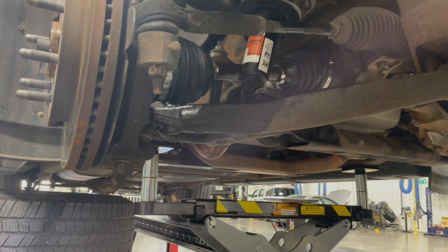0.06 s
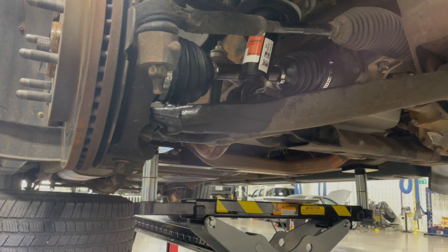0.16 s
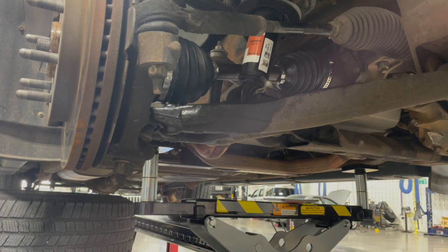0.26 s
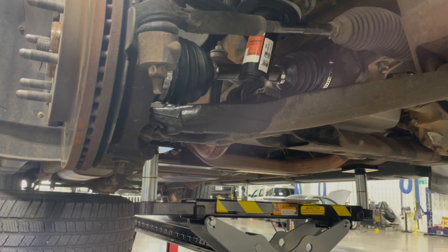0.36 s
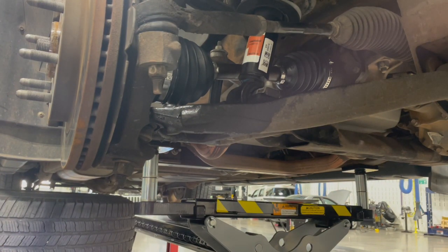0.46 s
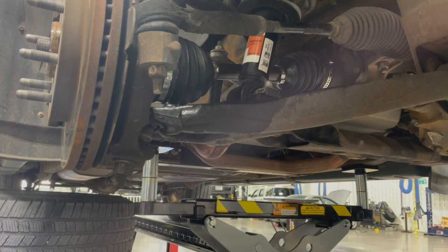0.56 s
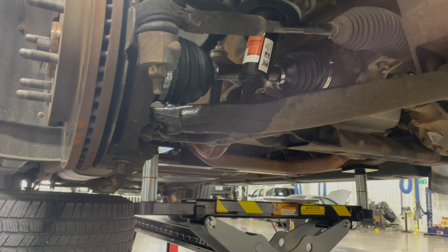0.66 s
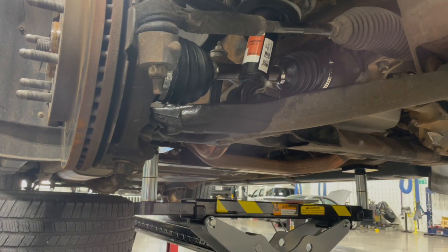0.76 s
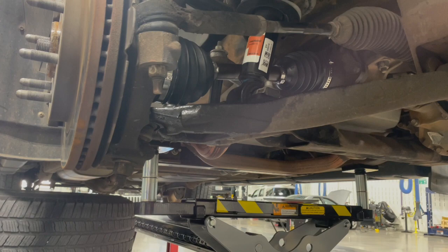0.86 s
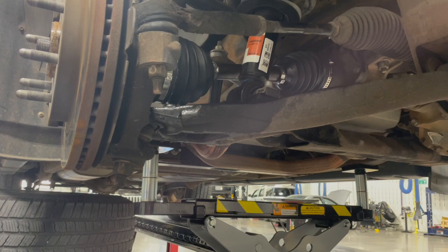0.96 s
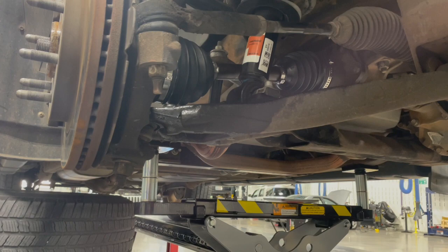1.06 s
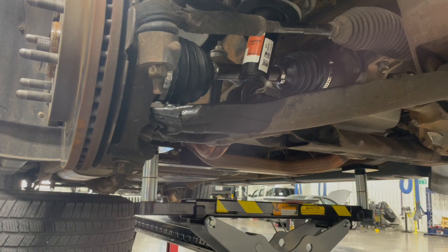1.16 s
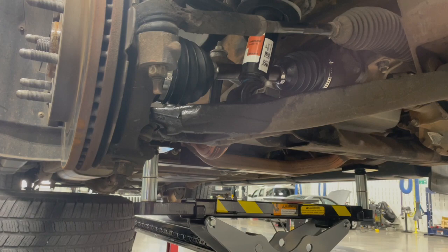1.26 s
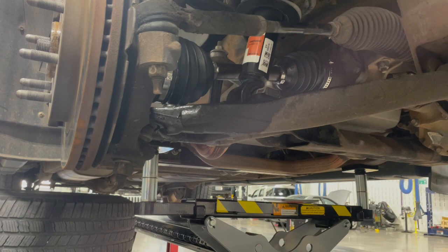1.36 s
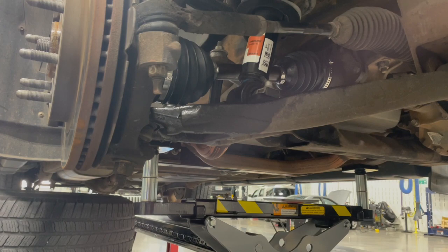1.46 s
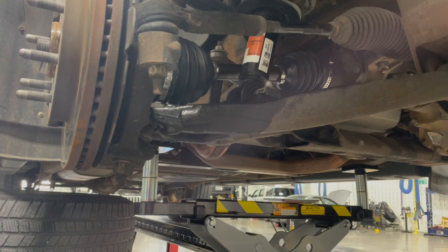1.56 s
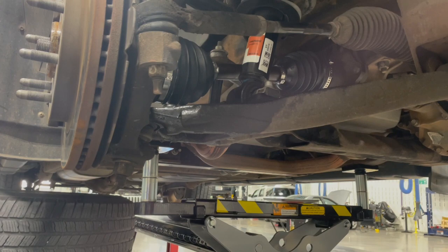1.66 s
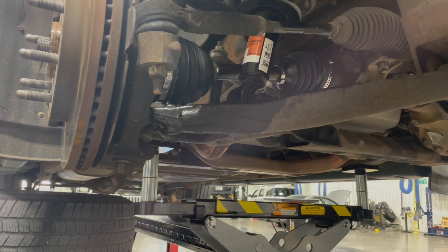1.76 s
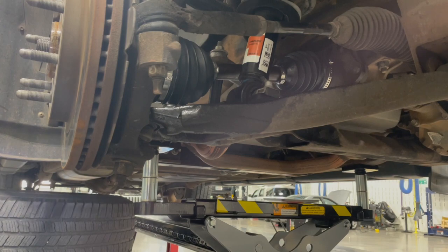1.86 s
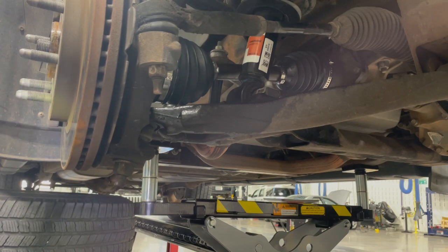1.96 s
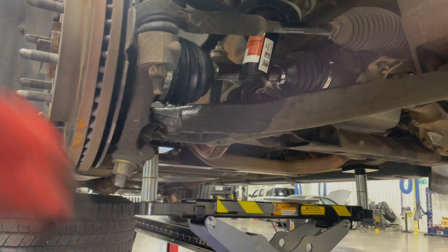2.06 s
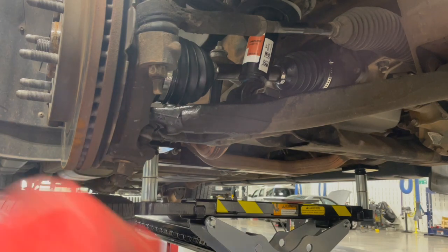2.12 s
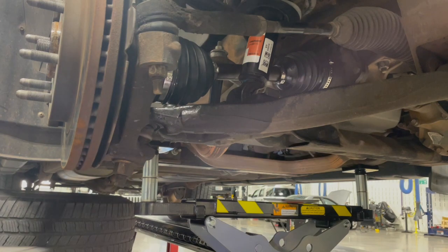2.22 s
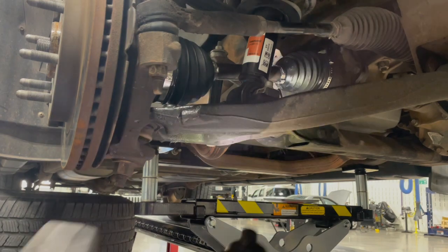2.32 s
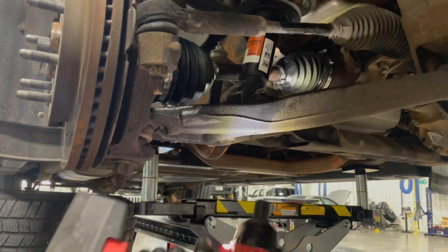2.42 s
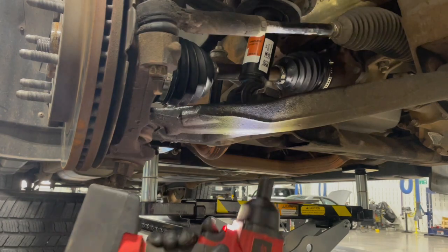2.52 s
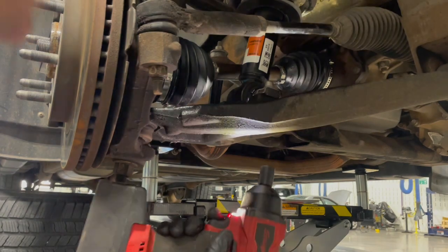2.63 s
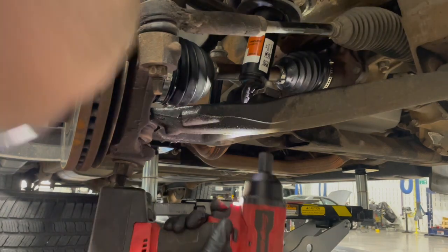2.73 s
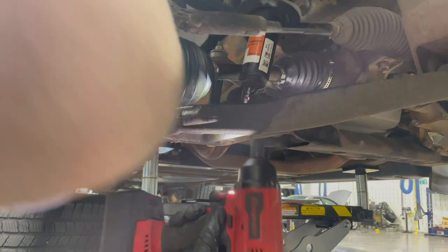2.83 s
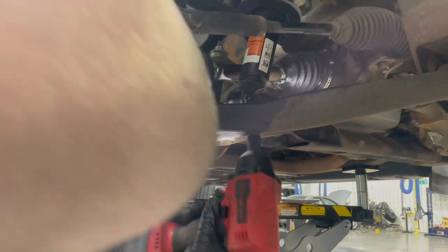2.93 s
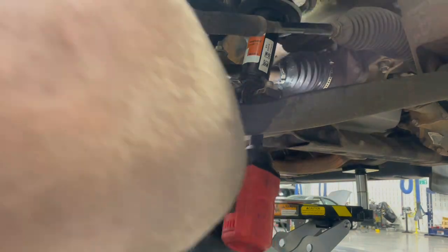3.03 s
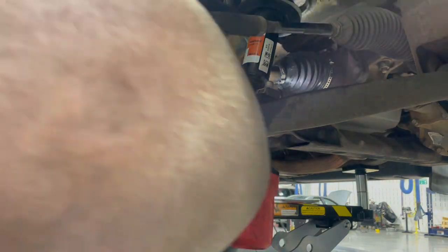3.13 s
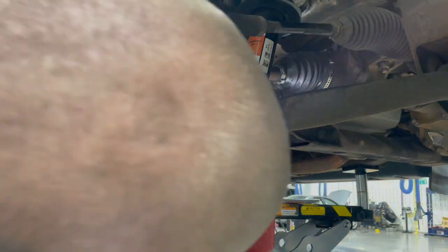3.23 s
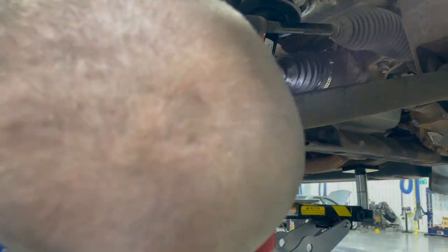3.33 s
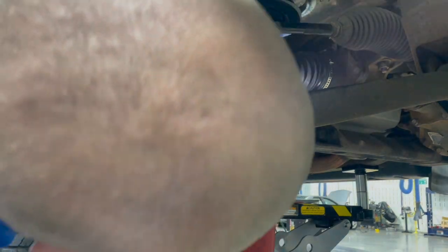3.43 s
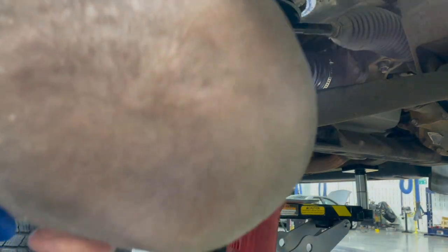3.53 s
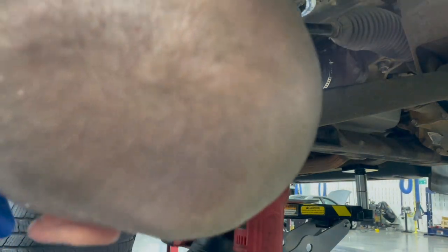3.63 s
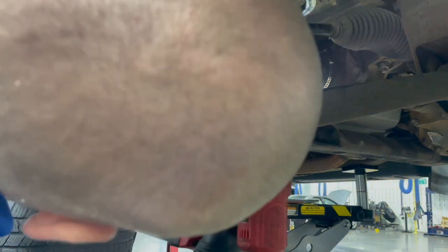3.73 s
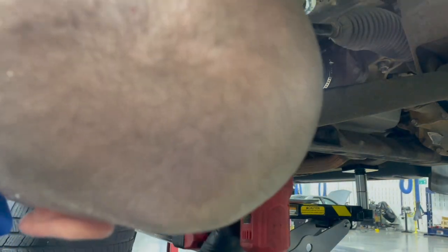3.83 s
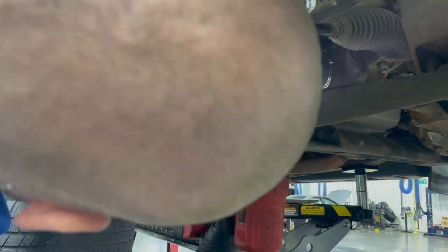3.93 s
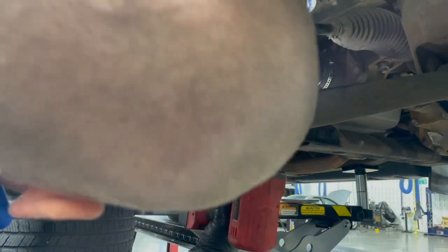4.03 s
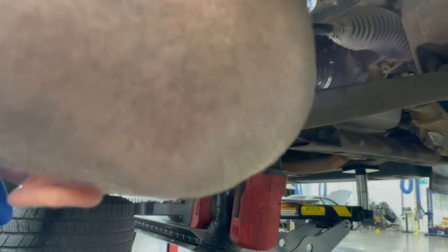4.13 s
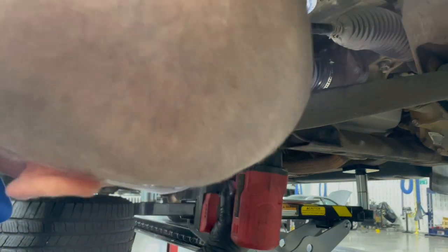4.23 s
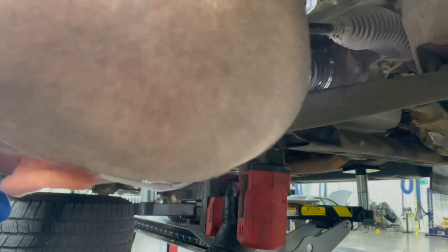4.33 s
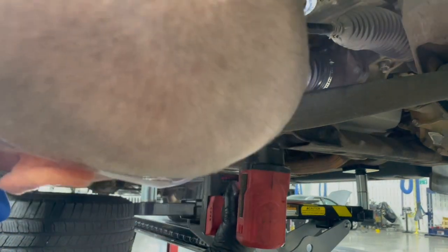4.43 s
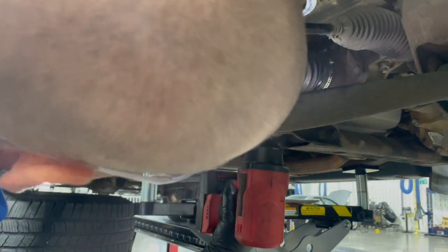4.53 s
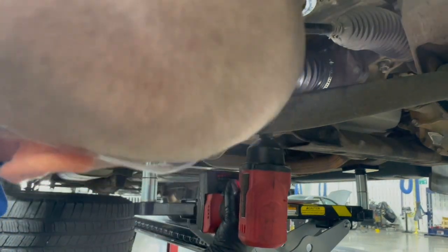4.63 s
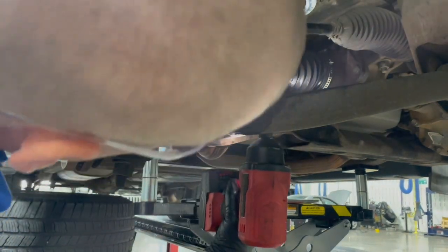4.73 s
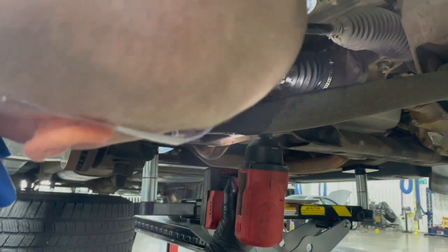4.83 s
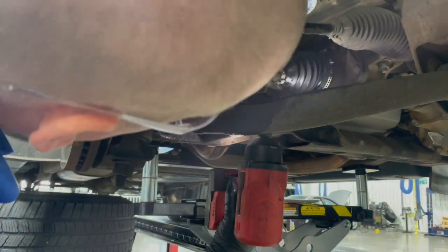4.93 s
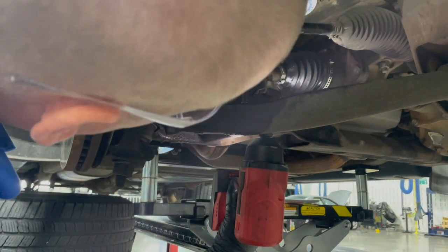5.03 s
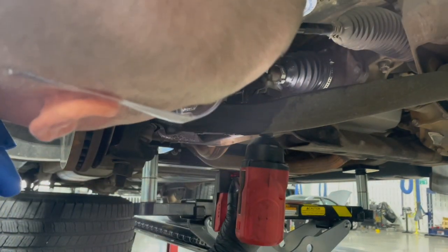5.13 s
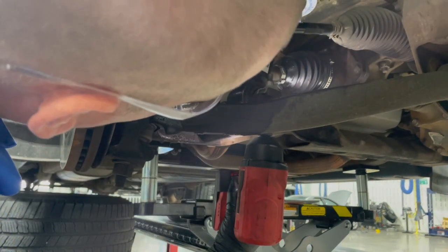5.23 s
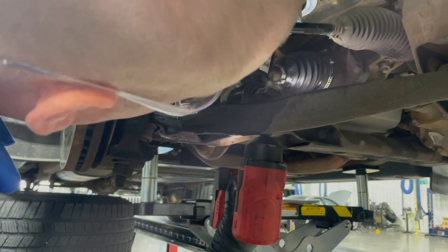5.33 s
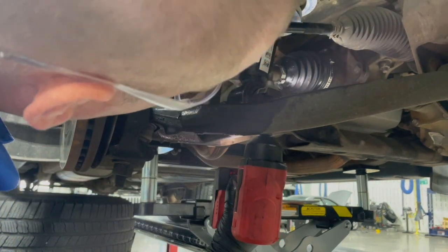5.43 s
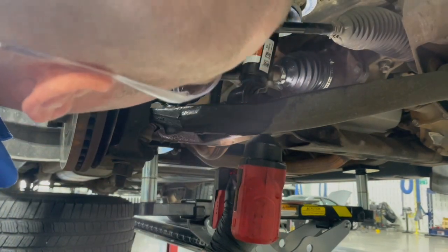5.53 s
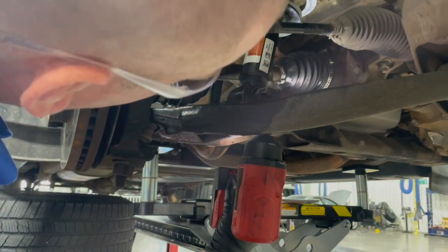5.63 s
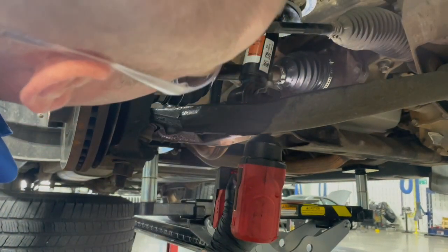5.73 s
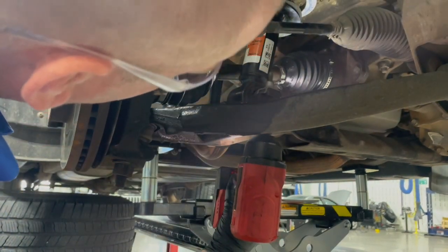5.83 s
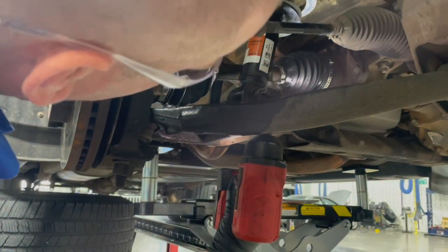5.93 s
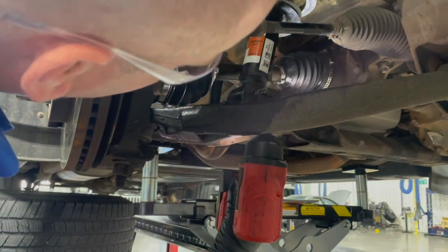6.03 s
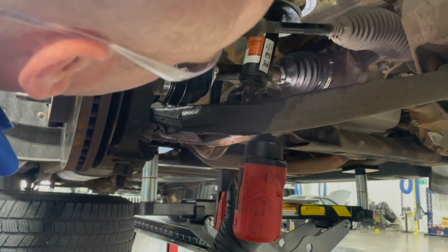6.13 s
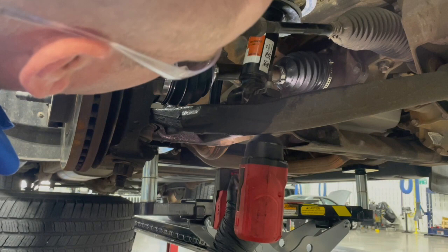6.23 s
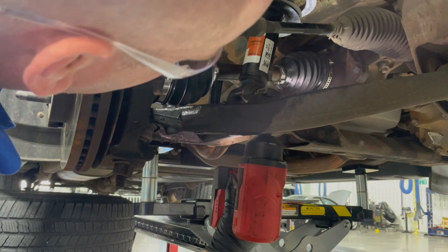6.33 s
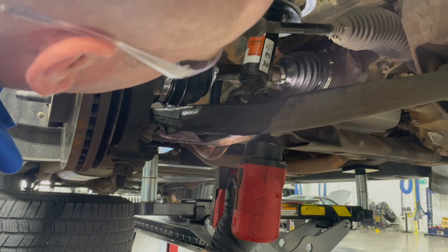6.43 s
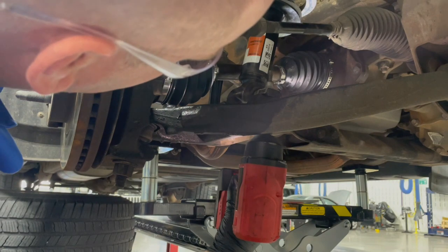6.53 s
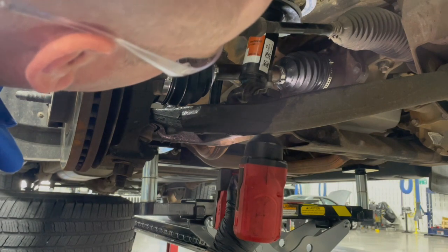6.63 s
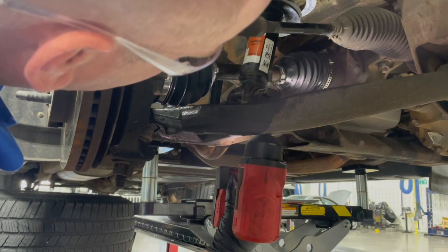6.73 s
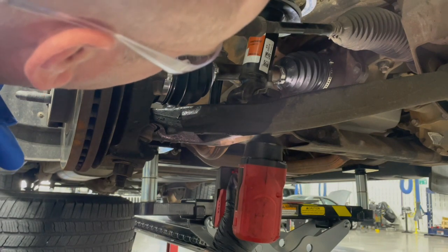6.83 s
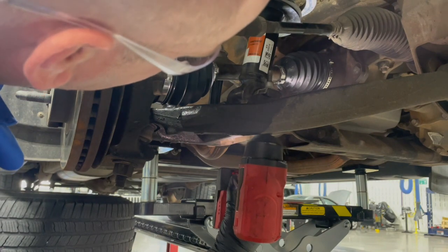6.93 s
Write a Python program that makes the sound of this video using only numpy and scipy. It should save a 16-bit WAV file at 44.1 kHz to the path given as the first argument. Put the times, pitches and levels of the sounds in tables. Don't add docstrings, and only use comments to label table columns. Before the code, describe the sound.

A quiet garage hum, heard close under a car in stereo. At 0.2-0.5 s small metal ticks lead into a gritty sole scuff; a shorter scuff comes near 1.7 s. Soft cloth rustles and faint ticks continue, with a sleeve pull stopping abruptly near 2.8 s. At 3.2 s the socket touches metal with a click and low clink; more knocks at 3.6 and 3.75 s seat it. From 3.93 s the wrench motor whines rapidly upward, and at about 4.15 s the hammer catches: very loud, dense steel blows, about fifty a second, uneven in strength and ring, over gear whirr and suspension ringing. Fan and drone sag as the bolt resists; blows weaken overall around 5.7-6.6 s, with light floor thumps at 5.55 and 6.1 s. At 6.7 s the bolt gives with a thump; hammering becomes faster and stronger, a brief airy gust passes at 6.8 s, and a hard jolt lands at 6.96 s.

```python
import sys
import numpy as np
from scipy import signal
from scipy.fft import rfft, irfft, next_fast_len
from scipy.io import wavfile

SR = 44100
rng = np.random.default_rng(int(sys.argv[2]) if len(sys.argv) > 2 else 0)


def invert_db(x):
    u = np.asarray(x, float) / 20
    return 10 ** u


def materialize(psi):
    bounded = np.clip(np.atleast_2d(psi).T, -1, 1)
    quanta = np.round(bounded * 32767).astype(np.int16)
    wavfile.write(sys.argv[1], SR, quanta)


N = 307377


def unit(x):
    return x / np.sqrt(np.mean(x ** 2) + 1e-20)


def along(points, hz):
    f, v = np.transpose(points)
    return np.interp(np.log(hz + 1), np.log(f + 1), v)


def curves(rows):
    s, *cols = np.transpose(rows)
    return [np.interp(np.arange(N) / SR, s, c) for c in cols]


def wobble(rate, size=N):
    knots = rng.standard_normal(int(size * rate / SR) + 2)
    return np.interp(np.arange(size) * rate / SR, np.arange(len(knots)), knots)


def filtered(x, response):
    m = next_fast_len(N + SR // 2)
    return irfft(rfft(x, m) * response(np.fft.rfftfreq(m, 1 / SR)), m)[..., :N]


def noise(spectrum, channels=2):
    white = rng.standard_normal((channels, N))
    return unit(filtered(white, lambda hz: invert_db(along(spectrum, hz))))


def add(track, s, sound):
    part = track[..., round(s * SR):][..., :sound.shape[-1]]
    part += sound[..., :part.shape[-1]]


def ring(hz, t60, attack=0.0015, size=8192):
    t = np.arange(size) / SR
    return np.sin(2 * np.pi * hz * t) * invert_db(-60 * t / t60) * (1 - np.exp(-t / attack))


def fuzzy(hz, rate, size=N, firm=0):
    turn = 2 * np.pi * np.cumsum(hz + np.zeros(size)) / SR
    return unit((firm + wobble(rate, size)) * np.sin(turn) + wobble(rate, size) * np.cos(turn))


# frequency in Hz, level in dB per Hz.
AIR_SPECTRUM = [(20, -36), (119, -10), (225, -11), (363, -12.5), (420, -20), (820, -21), (1050, -29),
                (3800, -29), (14000, -59)]
AIR_DB = -63
DUCK_S, DUCK_DB = 4.15, -3.5


def still_air():
    air = noise(AIR_SPECTRUM)
    air = unit(air + 2.05 * filtered(air[0], lambda hz: 1 / (1 + (hz / 400) ** 2)))
    ducked = np.clip((np.arange(N) / SR - DUCK_S) / .15, 0, 1)
    return air * invert_db(AIR_DB + DUCK_DB * ducked)


def strokes(rows, rise_db_per_s, fall_db_per_s, over_db=0):
    t = np.arange(4000) / 1000
    gains = 0
    for s, hold_s, db, hiss_db, rub_db in rows:
        early_db = rise_db_per_s * np.clip(s - t, 0, None)
        late_db = fall_db_per_s * np.clip(t - s - hold_s, 0, None)
        gains = gains + invert_db(db + over_db - early_db - late_db) * invert_db([[0], [hiss_db], [rub_db]])
    return np.array(curves(np.transpose([t, *gains])))


# frequency in Hz, level in dB per Hz.
GRIT_SPECTRUM = [(900, -27.5), (1400, -11), (2200, -1), (3530, -3.5), (6010, -4), (6800, -8), (7150, -36),
                 (9750, -67), (16500, -120)]
HISS_SPECTRUM = [(4710, -26.5), (7900, -8.5), (8790, -10), (11400, -12.5), (15000, -31)]
RUB_SPECTRUM = [(76, -37), (130, -3.5), (444, -2), (579, -10), (748, 0), (1500, -18), (1950, -17),
                (3300, -120)]
# start in seconds, hold in seconds, grit in dB, hiss and rub in dB over the grit.
STEPS = [
    (.445, 0.014, -35.5, -22, -12.5),
    (1.675, 0.0045, -41.5, -26, -2.5),
]
# start in seconds, hold in seconds, grit in dB, hiss and rub in dB over it.
RUSTLES = [(0, .01, -67.5, -14, -2), (.375, 0.043, -59, -18, -5), (1.258, 0.033, -58, -25, -2),
           (1.58, 0.029, -71, -30, 12), (1.858, 0.098, -63, -4.5, -14), (2.035, 0.03, -66, -8, -3),
           (2.08, 0.069, -72, -6, 2), (2.19, 0.078, -59.5, -9.5, -4), (2.29, 0.13, -68, -8.5, 9.5),
           (1.39, 0.18, -74, -30, 4), (2.458, 0.12, -61, -3.5, 1.5), (2.62, 0.093, -56, -6.5, 1.5),
           (2.81, 0.057, -68.5, -12, 1), (2.9, .25, -76, -13, 0), (3.225, 0.0028, -61.5, -6, -9),
           (3.25, 0.05, -88.5, -22, 35.5), (3.385, 0.033, -87, -7, -10), (3.418, 0.02, -62, -2.5, -10),
           (3.607, 0.019, -46.5, -16, 4.5), (3.644, 0.011, -45, -19, 7.5), (3.728, 0.015, -41, -14.5, 3),
           (3.78, 0.1, -66.5, -31, 8)]
# start in seconds, hold in seconds, grit in dB, hiss and rub in dB over it.
SLEEVE = [
    (2.71, 0.075, -44, -16, -23),
]
# time in seconds, frequency in Hz, level in dB over the grit.
SQUEEZE = [(.36, 2317, -7), (.43, 2680, -9), (.5, 3700, -9.5), (.86, 3640, -9), (1.25, 2595, -4),
           (1.42, 2440, -3), (1.58, 2455, 5.5), (1.66, 3030, -11), (1.72, 3106, -6), (1.97, 3080, -4.5),
           (2.03, 2390, -22), (2.3, 2315, -3.5), (2.47, 2250, -0.5), (2.65, 2500, -1), (2.79, 2850, -7),
           (2.83, 2910, -13), (3.9, 2910, -13)]
RISE_DB_PER_S, FALL_DB_PER_S, STOP_DB_PER_S = 742, 439, 1400
SKIRT_DB, LEAD_DB_PER_S, TAIL_DB_PER_S = -9, 232, 61.5
RUB_FLOOR_DB, HISS_FLOOR_DB = -74, -92


def scuffs():
    gains = strokes(STEPS + RUSTLES, RISE_DB_PER_S, FALL_DB_PER_S)
    gains = gains + strokes(STEPS, LEAD_DB_PER_S, TAIL_DB_PER_S, SKIRT_DB)
    drag, hiss, low = gains + strokes(SLEEVE, RISE_DB_PER_S, STOP_DB_PER_S)
    squeeze_hz, squeeze_db = curves(SQUEEZE)
    grit = unit(invert_db(1.5 * wobble(300) + 1.2 * wobble(54)))
    body, rub = noise(GRIT_SPECTRUM), noise(RUB_SPECTRUM)
    body = unit(body + 0.43 * body[0])
    first = invert_db(squeeze_db + 3 * wobble(12)) * fuzzy(squeeze_hz * (1 + .02 * wobble(14)), rate=650)
    second = invert_db(squeeze_db - 5 + 3 * wobble(12)) * fuzzy(2.1 * squeeze_hz, rate=700)
    body = unit(body + first + second * (np.arange(N) > 2.1 * SR))
    breath = invert_db(7.5) * (hiss + invert_db(HISS_FLOOR_DB - 6.5)) * noise(HISS_SPECTRUM)
    rumble = invert_db(-5.5) * (low + invert_db(RUB_FLOOR_DB)) * unit(rub + 0.18 * rub[0])
    out = grit * (drag * body + breath) + rumble
    return out * (np.arange(N) < 3.95 * SR) * invert_db([[1.3], [-1.3]])


# start in seconds, peak in dB, frequency in Hz, t60 in seconds, share of broad crack 0-1.
TICKS = [(0.2025, -22, 2400, 0.014, 0.01), (0.339, -42, 2500, 0.024, 0), (0.3656, -27.5, 2140, 0.046, 0),
         (1.3748, -44.5, 2580, 0.029, 0.66), (2.6595, -33, 2480, 0.023, 0.36), (2.8694, -58, 4450, 0.03, 0),
         (3.204, -46, 5800, 0.02, .1), (3.212, -44, 2800, .02, 0.3), (3.2222, -27, 1440, 0.042, 0.23),
         (3.228, -31, 3800, 0.02, 0.54), (3.283, -45, 1480, .05, .01), (3.496, -50, 5500, .02, 0.3),
         (2.6595, -34.5, 3680, 0.037, 0.1), (0.434, -38, 2500, 0.013, 0.76), (0.461, -30, 2600, 0.01, 0.8),
         (2.297, -46, 620, .04, .05), (0.53, -48, 2700, .015, 0.9), (2.485, -50, 2000, 0.055, 0.1),
         (3.721, -36, 4300, 0.0098, 1), (3.495, -45, 1450, 0.03, 0.03), (3.583, -40, 3350, 0.03, 0.3),
         (1.27, -46.5, 1400, 0.11, 0.8), (3.748, -29, 3300, 0.054, 0.48), (3.726, -22, 1500, 0.019, 0),
         (3.891, -38.5, 2900, 0.021, 0.8), (3.935, -28, 2800, 0.02, .2)]
# start in seconds, peak in dB, frequency in Hz, t60 in seconds.
KNOCKS = [(2.221, -30.5, 208, 0.083), (2.345, -41, 510, 0.029), (2.658, -38.5, 232, 0.056),
          (3.231, -28.5, 430, 0.036), (3.613, -35, 424, 0.15), (3.647, -29.5, 437, 0.11),
          (3.735, -21, 442, 0.049), (3.749, -29.5, 762, 0.18), (4.125, -35, 164, 0.08),
          (4.135, -29.5, 302, 0.049), (6.513, -31, 920, 0.047), (6.683, -34, 940, 0.15),
          (5.19, -42, 850, 0.04), (4.469, -29.5, 456, 0.062), (5.26, -45, 437, 0.043),
          (5.328, -28.5, 454, 0.044), (5.636, -33, 476, 0.13)]
# frequency in Hz, level in dB, t60 in seconds.
LINK = [(447, -6, .14), (754, -5, .18), (2003, -10, .1), (2395, -11, .24)]
# start in seconds, level in dB.
CLINK = [
    (3.222, -34.5),
    (3.60, -34.5),
    (3.735, -38),
]
# frequency in Hz, level in dB, t60 in seconds.
PING = [(4020, -62, .25), (11050, -60, .3)]


def socket():
    out, t = np.zeros((2, N)), np.arange(4096) / SR
    click = noise([(900, -7), (2000, 12), (4000, 5.5), (6500, -7.0), (12000, -21), (15000, -47)])
    thud = noise([(100, -14), (200, 7.0), (700, -0.5), (1500, -16.0), (3000, -41.0)], channels=1)
    for s, db, hz, t60, share in TICKS:
        crack = click[:, round(s * SR):][:, :len(t)] * invert_db(-60 * t / t60)
        modes = sum(level * ring(hz * ratio, t60 / 2, size=4096)
                    for ratio, level in [(1, 1.0), (1.3, 0.18), (1.2, 0.16)])
        add(out, s, invert_db(db) * (modes + share * crack))
    for s, db, hz, t60 in KNOCKS:
        puff = thud[:, round(s * SR):][:, :len(t)]
        puff = puff * invert_db(-60 * t / (1.37 * t60)) * (1 - np.exp(-t / 0.0042))
        add(out, s, invert_db(db) * (ring(hz, t60, attack=0.00088, size=4096) + 0.5 * puff))
    for s, db in CLINK:
        add(out, s, sum(invert_db(db + level) * ring(hz, t60, attack=0.014) for hz, level, t60 in LINK))
    for hz, db, t60 in PING:
        add(out, 3.418, invert_db(db) * ring(hz, t60, attack=0.0028) * fuzzy(36, rate=170, size=8192))
    return out * invert_db([[1.2], [-1.2]])


# frequency in Hz, t60 in seconds.
GARAGE = [(200, 0.23), (2000, 0.15), (10000, 0.042)]


def garage(x):
    hz, t, z = signal.stft(rng.standard_normal((2, SR // 2)), SR, nperseg=256)
    tail = signal.istft(z * invert_db(-60 * t / along(GARAGE, hz)[:, None]), SR, nperseg=256)[1]
    tail = tail / np.linalg.norm(tail[0])
    return signal.fftconvolve(np.pad(x, (300, 0))[None], tail, axes=1)[:, :N]


# time in seconds, whirr in dB.
EFFORT = [(3.92, -70), (3.944, -56), (3.954, -37), (3.972, -39), (3.995, -27), (4.06, -26), (4.125, -25),
          (4.14, -18.5), (4.155, -20.5), (4.2, -29), (4.75, -29), (5.4, -31.5), (6.4, -31.5), (6.68, -29.5),
          (6.8, -30.5), (6.97, -32.5)]
# time in seconds, pole rate in Hz, whine in dB.
SPIN = [
    (3.93, 120, -64),
    (3.97, 300, -52),
    (3.995, 530, -31),
    (4.022, 705, -29),
    (4.05, 825, -30),
    (4.08, 895, -32),
    (4.11, 905, -32),
    (4.14, 860, -32),
    (4.19, 790, -70),
]
FAN_DB, DRONE_DB, SPEED_POWER = -7.5, -9.5, 0.63
BIND_S, GIVE_S, FAN_SAG_DB_PER_S, DRONE_SAG_DB_PER_S, FREED = 4.41, 6.55, 5, 6.5, 0.39
GUST_S, GUST_WIDE_S, GUST_DB = 6.82, .09, 13


def levels():
    (whirr_db,), speed, t = curves(EFFORT), curves(SPIN)[0] / 900, np.arange(N) / SR
    freed = FREED * np.clip((t - GIVE_S) / 0.15, 0, 1)
    bound_s = np.clip(np.minimum(t, GIVE_S) - BIND_S, 0, None) * (1 - freed)
    base_db = whirr_db + SPEED_POWER * 20 * np.log10(speed)
    gust_db = GUST_DB * np.exp(-((t - GUST_S) / GUST_WIDE_S) ** 2)
    fan_db = base_db + FAN_DB - FAN_SAG_DB_PER_S * bound_s + gust_db
    return whirr_db, fan_db, base_db + DRONE_DB - DRONE_SAG_DB_PER_S * bound_s


# multiple of the pole rate, level in dB.
POLES = [(.5, -6), (1, 3), (2, 1), (3, -3), (4, -6), (5, -4), (6, 1), (7, 1)]


def whine():
    out, free = np.zeros(N), slice(round(3.9 * SR), round(4.25 * SR))
    pole_hz, whine_db = [c[free] for c in curves(SPIN)]
    for k, db in POLES:
        growth = (pole_hz / 900) ** min(8, 40 / k ** 2)
        tone = fuzzy(k * pole_hz, rate=45, size=len(pole_hz), firm=1.3)
        out[free] += invert_db(whine_db) * invert_db(db) * growth * tone
    return filtered(out, lambda hz: (1 + 1.6 / (1 + ((hz - 3350) / 450) ** 2)) / (1 + (hz / 3800) ** 16))


def switching():
    pole_hz, t = curves(SPIN)[0], np.arange(N) / SR
    out = invert_db(-56.5 + 0.026 * pole_hz) * fuzzy(9950 + 1.58 * pole_hz, rate=120, firm=0.82)
    out = out * np.clip((t - 3.925) / .005, 0, 1) * (t < 4.14)
    rough = fuzzy(260, rate=370, size=8192, firm=1.0)
    add(out, 4.134, invert_db(-3.0) * ring(8400, t60=0.027, attack=0.00087) * rough)
    return out


# frequency in Hz, width in Hz, level in dB.
CHASSIS = [(1460, 145, 9), (2520, 220, 4), (3780, 580, -9), (5180, 60, 2.5), (6120, 220, -1.5)]


def chassis(f):
    return sum((-1) ** k * invert_db(db) * 1j * f * w / (c * c - f * f + 1j * f * w)
               for k, (c, w, db) in enumerate(CHASSIS))


# frequency in Hz, start in seconds, end in seconds, level in dB.
BOLT = [
    (5603, 5.85, 7, -42),
    (4780, 6.7, 7, -40),
    (947, 5.75, 6.75, -53),
    (3657, 4.2, 7, -43),
    (3705, 4.7, 7, -42),
    (759, 4.2, 6.9, -56),
    (296, 4.2, 4.6, -51),
    (462, 4.2, 5.1, -53),
    (887, 4.2, 5.6, -54),
]


def bolt_rings():
    out = np.zeros(N)
    for hz, start_s, end_s, db in BOLT:
        size = round((end_s - start_s) * SR)
        level = invert_db(db + 2.3 * wobble(25, size))
        add(out, start_s, level * fuzzy(hz, rate=50, size=size, firm=1.0))
    return out


SHAKE_S, SHAKE_DB, STEADY = 0.0068, 9, 0.5


def shaking(hits):
    out, t = np.zeros(N), np.arange(2048) / SR
    for s, db, hz in hits:
        add(out, s, invert_db(db / 2 + SHAKE_DB) * np.exp(-t / SHAKE_S) * (1 - np.exp(-t / 0.0032)) ** 2)
    return np.where(np.arange(N) < hits[0, 0] * SR, 1, STEADY + out)


# frequency in Hz, level in dB per Hz.
GEARS = [(650, -44), (1100, -26), (1550, -10), (2000, -11), (2800, 0.5), (5860, -9.5), (7000, -37),
         (9500, -120)]
# frequency in Hz, level in dB per Hz.
DRONE = [(70, -95), (125, -31), (170, -12), (390, -1.5), (620, -6.5), (880, 3.5), (1300, -5), (1800, -90)]


def motor(hits, whirr_db, fan_db, drone_db):
    gears = noise(GEARS)
    gears = unit(gears + unit(filtered(gears, chassis))) * invert_db(whirr_db + 2.6 * wobble(60))
    drone = noise(DRONE) * invert_db(drone_db + 3.2 * wobble(40))
    fan = noise(HISS_SPECTRUM) * invert_db(fan_db)
    shaken = shaking(hits) * (gears + bolt_rings())
    return (np.arange(N) / SR > 3.9) * (shaken + fan + drone + whine() + switching())


# blow number, time in seconds.
PACE = [(0, 4.1723), (1, 4.1963), (4, 4.2613), (6, 4.3028), (9, 4.363), (14, 4.4617), (27, 4.7154),
        (50, 5.1661), (55, 5.2636), (63, 5.419), (85, 5.8442), (95, 6.0365), (102, 6.1703), (105, 6.2286),
        (119, 6.5003), (123, 6.5778), (125, 6.6135), (145, 6.9599)]
# time in seconds, blow peak in dB.
GRIP = [
    (4.17, -1.5),
    (4.3, -5),
    (4.7, -4.5),
    (5.3, -6),
    (5.7, -8.5),
    (6.2, -10),
    (6.66, -10),
    (6.71, -1),
    (6.97, -3.5),
]
# time in seconds, level in dB over the grip, ring in Hz.
BLOW_LEVELS = [(4.172, -0.5, 2900), (4.196, -1.5, 2950.0), (4.218, 2, 2830), (4.261, 2.0, 2500),
               (4.282, -1, 2840.0), (4.303, 1.5, 2520.0), (4.323, 1.0, 2840.0), (4.363, -0.5, 2400),
               (4.383, 2, 2750), (4.422, -3.5, 3010.0), (4.442, -2.0, 3030), (4.481, 2.0, 2720),
               (4.501, -1.0, 2760.0), (4.52, -1, 3600), (4.54, -4.5, 6140.0), (4.559, 1.5, 2650.0),
               (4.618, 1.5, 2880), (4.637, -4.5, 2780), (4.657, 0.5, 3900.0), (4.676, -1, 2520.0),
               (4.696, 3, 2870), (4.715, -1.5, 2560.0), (4.735, 4.0, 2890.0), (4.755, 1, 2670.0),
               (4.794, -0.5, 5250.0), (4.813, 2.5, 2630.0), (4.833, -1.5, 2690.0), (4.853, 1.5, 2550),
               (4.911, -4, 2890.0), (4.931, -0.5, 5320), (4.951, 1, 2730.0), (4.97, 2.0, 2480),
               (5.009, 0.5, 2890.0), (5.029, 1.5, 3260), (5.049, 1, 2890.0), (5.068, -1.5, 2910.0),
               (5.107, 3.0, 2790), (5.127, -1.5, 2950.0), (5.147, -1.0, 2710.0), (5.166, -1.0, 6000),
               (5.205, 3, 2640), (5.225, 2.5, 2840.0), (5.244, 3.5, 3610), (5.264, 3.5, 2830),
               (5.283, -3.5, 4220), (5.302, 2.5, 2780.0), (5.361, 2.0, 2500.0), (5.38, -6, 2460),
               (5.4, 3.5, 2700), (5.419, -1, 2460), (5.458, 2.5, 6030), (5.477, -0.5, 2890.0),
               (5.496, 3.5, 2670.0), (5.516, -6, 2710.0), (5.535, 4.0, 2650.0), (5.554, 1, 2890.0),
               (5.574, 3.5, 2880), (5.593, 1.0, 2820), (5.612, -4.0, 2580.0), (5.632, -5, 2840.0),
               (5.67, 1.0, 2840), (5.69, 1, 3530.0), (5.709, 4.5, 4010.0), (5.728, -1.0, 2540.0),
               (5.748, -6, 2540.0), (5.767, -3.5, 6180.0), (5.786, 4.5, 1550), (5.806, -1, 2300),
               (5.825, 5.0, 2620), (5.844, -2.0, 2500.0), (5.863, 4.0, 3960.0), (5.883, 3.5, 6030.0),
               (5.902, 4, 2520.0), (5.921, -1.5, 2910.0), (5.96, 7, 2680), (5.979, -0.5, 3340.0),
               (5.998, 2.5, 2750), (6.036, -5, 2670.0), (6.056, 5.5, 2730.0), (6.075, -0.5, 2220.0),
               (6.094, 5, 2570), (6.113, 3, 3470), (6.132, 2, 2480), (6.151, 3.5, 3640.0),
               (6.19, 4.0, 2570), (6.209, -0.5, 6090.0), (6.229, 0, 3640.0), (6.248, -0.5, 2760.0),
               (6.287, 1.5, 3290.0), (6.306, 3.5, 5300), (6.326, 3.5, 2460), (6.345, 0.5, 2520.0),
               (6.364, 7.5, 2580.0), (6.384, 4, 2730.0), (6.403, 3.0, 3230.0), (6.423, 4, 5440),
               (6.442, 3.0, 3140), (6.461, 5.5, 6030.0), (6.481, -3.5, 2990.0), (6.5, 5.5, 6200),
               (6.539, 3.5, 3560), (6.558, -4, 3490.0), (6.578, 4.5, 4670), (6.596, -4, 5060.0),
               (6.631, 2.5, 3420.0), (6.665, 3, 2670.0), (6.683, -5, 4200.0), (6.7, 0.5, 2630.0),
               (6.717, -1, 4410.0), (6.735, -1, 2780.0), (6.752, -3.5, 2550), (6.769, 1.5, 2520.0),
               (6.787, -2.5, 2890.0), (6.821, -0.5, 6240), (6.856, -2.5, 2710.0), (6.873, -0.5, 6100),
               (6.891, -0.5, 2630), (6.908, -2.5, 5120.0), (6.943, -1, 4010.0), (6.96, -0.5, 2830),
               (4.24, 0.0, 2840.0), (4.343, 0.0, 2630.0), (4.402, 0.0, 5810.0), (4.462, 0.0, 2540.0),
              (4.579, 0.0, 2650.0), (4.598, 0.5, 2730.0), (4.774, 0.0, 2650.0), (4.872, 0.0, 2910.0),
              (4.892, 0.0, 3640.0), (4.99, -0.5, 2480.0), (5.088, 0.5, 6030.0), (5.186, 0.0, 3290.0),
              (5.322, 0.0, 2800.0), (5.341, 0.0, 2560.0), (5.438, 0.0, 2450.0), (5.651, 0.0, 2500.0),
              (5.94, 0.0, 6350.0), (6.017, 0.5, 3250.0), (6.17, 0.5, 6070.0), (6.267, 0.0, 2560.0),
              (6.52, 0.5, 2690.0), (6.614, 0.0, 2760.0), (6.648, 0.5, 2820.0), (6.804, 0.5, 2670.0),
              (6.839, 0.5, 2800.0), (6.925, 0.0, 2760.0)]
LUGS_HZ = [2550, 2850, 3650, 4800, 5900]
LUG_ODDS = [.38, .4, .12, .04, .06]
LUG_SPREAD, SCATTER_DB, SCATTER_S = .03, 0.7, .0004
LATE_S = .0003


def blows():
    number, at_s = np.transpose(PACE)
    s = np.interp(np.arange(number[-1] + 1), number, at_s)
    luck = rng.standard_normal((len(s), 3))
    db = np.interp(s, *np.transpose(GRIP)) + SCATTER_DB * luck[:, 0]
    hz = rng.choice(LUGS_HZ, len(s), p=LUG_ODDS) * (1 + LUG_SPREAD * luck[:, 1])
    for blow_s, over_db, ring_hz in BLOW_LEVELS:
        k = np.argmin(abs(s - blow_s))
        db[k] += over_db - SCATTER_DB * luck[k, 0]
        hz[k] = ring_hz
    return np.transpose([s + LATE_S + SCATTER_S * luck[:, 2], db, hz])


# frequency in Hz, level in dB per Hz.
STRIKE = [(300, -24), (500, -22), (1040, -12), (1480, 0), (1840, -6.5), (2700, 7), (3300, -2), (6100, 1.5),
          (7600, -3), (10700, -14), (13000, -17.5), (16000, -25)]
UPPER_HZ, UPPER_DB, UPPER_FREED_DB = (4130, 6220), -6, 3
REBOUND_S, REBOUND_SCATTER_S = .0046, .0012


def hammer(hits):
    out, high, rings, t = np.zeros((2, N)), np.zeros(N), np.zeros(N), np.arange(1024) / SR
    steel = noise(STRIKE)
    body = filtered(steel, lambda hz: 1 / (1 + (hz / 7600) ** 12))
    body, edge = unit(body), unit(steel - body)
    first = (1 - np.exp(-t / 0.00095)) ** 2 * np.exp(-t / 0.0014)
    sizzle = (1 - np.exp(-t / 0.00031)) * (np.exp(-t / 0.0021) + .3 * np.exp(-t / 0.0066)) * .25
    swell = (1 - np.exp(-t / 0.00072)) ** 2
    for (s, db, hz), (late, soft, bright, upper) in zip(hits, rng.random((len(hits), 4))):
        back = np.clip(t - REBOUND_S - REBOUND_SCATTER_S * late, 0, 1)
        rebound = invert_db(-14.5 - 7.7 * soft) * (1 - np.exp(-back / 0.00033)) * np.exp(-back / 0.0016)
        chatter = body[:, round(s * SR) - len(t):][:, :len(t)]
        chatter = chatter * np.linalg.norm(first) / np.linalg.norm(chatter * first, axis=1, keepdims=True)
        add(out, s - .0006, invert_db(db) * (first + rebound) * chatter)
        add(high, s - .0005, invert_db(0.63 * db - 7.0 + 7.3 * bright) * sizzle)
        freed_db = UPPER_FREED_DB * (s > GIVE_S)
        main = ring(hz, t60=0.0059, attack=0.00033, size=1024)
        add(rings, s, invert_db(db + 9 - freed_db) * swell * main)
        upper_hz = UPPER_HZ[0] + upper * (UPPER_HZ[1] - UPPER_HZ[0])
        second = ring(upper_hz, t60=0.0079, attack=0.0011, size=1024)
        add(rings, s, invert_db(db + UPPER_DB + freed_db) * second)
    total = out + high * edge + rings * invert_db([[0], [-6]])
    return filtered(total, lambda hz: 1 / (1 + (330 / (hz + 1)) ** 6))


def arm(hits, drone_db):
    out, t = np.zeros(N), np.arange(N) / SR
    push = ring(463.6, t60=0.059, attack=0.0065, size=2048)
    for (s, db, hz), luck in zip(hits, rng.standard_normal(len(hits))):
        add(out, s, invert_db(db / 2 + 6.6 * luck) * push)
    out = filtered(out, lambda hz: 1 / (1 + (250 / (hz + 1)) ** 4))
    song = sum(invert_db(-2 * abs(k - 9) - 7 * (k % 2)) * np.sin(2 * np.pi * (k * 57.8 * t + rng.random()))
               for k in range(6, 14))
    song_gain = invert_db(-42.0 - 60 * np.clip(t - 6.86, 0, 1)) * (t > 6.72)
    return out * invert_db(drone_db + 9.0) * [[1], [.4]] + song_gain * song


# start in seconds, peak in dB.
JOLTS = [
    (5.553, -24),
    (6.093, -27),
    (6.718, -22.5),
    (6.959, -8),
]


def jolts():
    out, t = np.zeros(N), np.arange(2048) / SR
    pitch_hz = 70 + 700 * np.exp(-t / 0.00505)
    thump = np.sin(2 * np.pi * np.cumsum(pitch_hz) / SR) * (1 - np.exp(-t / 0.007)) * np.exp(-t / 0.0079)
    for s, db in JOLTS:
        add(out, s, invert_db(db) * thump)
    return out * invert_db([[1.2], [-1.2]])


# frequency in Hz, side minus mid in dB.
WIDTH = [(100, -23), (640, -5), (1410, -14.5), (3100, -19.5), (7000, -2), (11300, -26.5), (15000, 3.5)]


def ports(pair):
    side = filtered(pair[1], lambda hz: invert_db(along(WIDTH, hz)))
    return np.array([pair[0] + side, pair[0] - side]) * invert_db([[.7], [-.7]])


def scene():
    hits, (whirr_db, fan_db, drone_db) = blows(), levels()
    steel, small = hammer(hits), socket()
    wrench = steel + motor(hits, whirr_db, fan_db, drone_db) + arm(hits, drone_db)
    room = garage(invert_db(-12.0) * steel[0] + invert_db(-11.0) * small[0])
    return ports(wrench) + room + small + scuffs() + jolts() + still_air()


def roll_off(x):
    return signal.sosfilt(signal.butter(12, 16520, fs=SR, output="sos"), x)


# frequency in Hz, phase in radians.
LAG = [(1500, 0), (3000, 0.68), (5000, 0.59), (6300, 0.4), (7100, 2.95), (8150, 3.3), (8700, 4.5),
       (11300, 6.3), (13200, 7.4), (14000, 9), (14900, 9.75), (15500, 11.5)]
FILL_DB, FILL_FLICKER_DB = -13, 7
STARVED_S = (3.95, 4.112)
# low edge in Hz, high edge in Hz.
STARVED_HZ = [(6900, 8350), (13100, 16500)]


def record(dry):
    mid, side = dry.mean(axis=0), (dry[0] - dry[1]) / 2
    side = side + filtered(mid, lambda hz: 1j * np.sin(along(LAG, hz) / 2))
    fill = filtered(mid, lambda hz: (hz > 6500) * 1j * np.sin(along(LAG, hz) / 2) ** 9)
    fill = fill * invert_db(FILL_DB + FILL_FLICKER_DB * wobble(30))
    mid = filtered(mid, lambda hz: np.cos(along(LAG, hz) / 2)) + fill
    mid, side = filtered(np.array([mid, side]), lambda hz: hz < 16050)
    t = np.arange(N) / SR
    starved = np.clip(np.minimum(t - STARVED_S[0], STARVED_S[1] - t) / .004, 0, 1)
    mid = mid - starved * filtered(mid, lambda hz: sum((hz > lo) * (hz < hi) for lo, hi in STARVED_HZ))
    both = np.array([mid + side, mid - side])
    squashed = both / (1 + np.abs(both / .95) ** 4) ** (1 / 4)
    both = both + filtered(squashed - both, lambda hz: (hz > 300) * (hz < 16050))
    return roll_off(both)


dry = scene()
out = record(dry)
materialize(out)
```